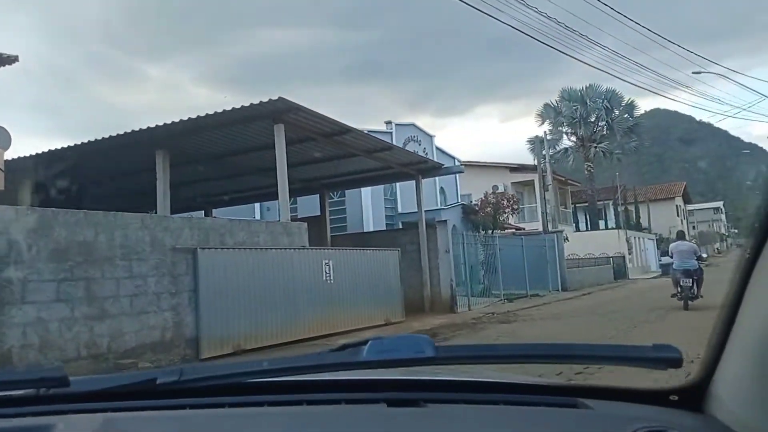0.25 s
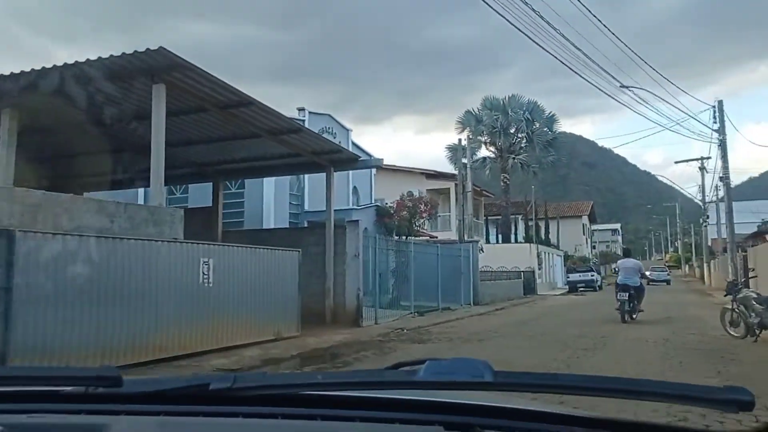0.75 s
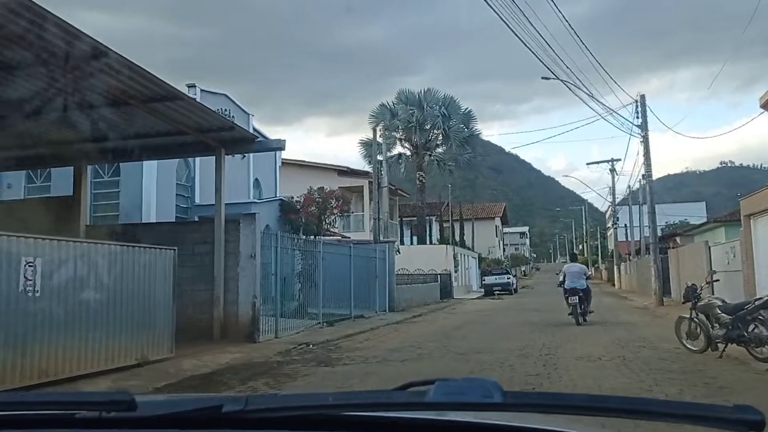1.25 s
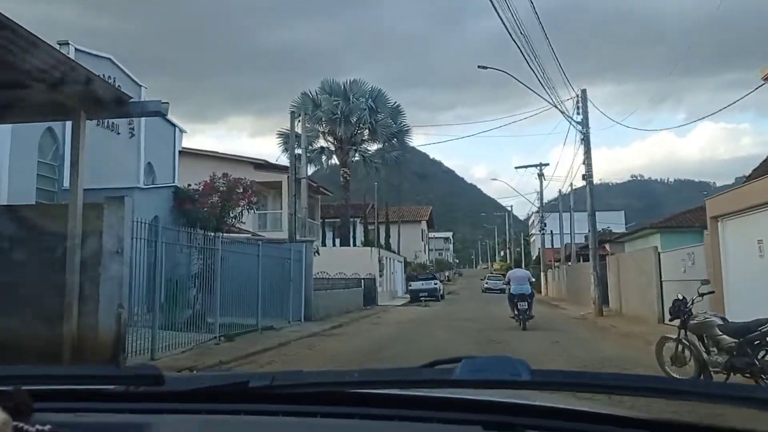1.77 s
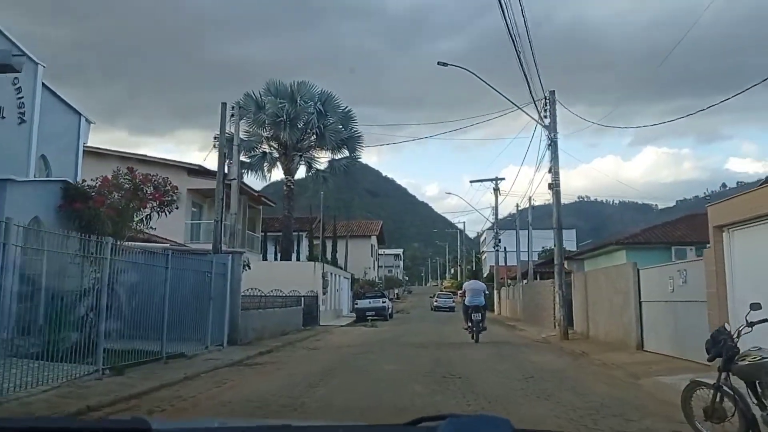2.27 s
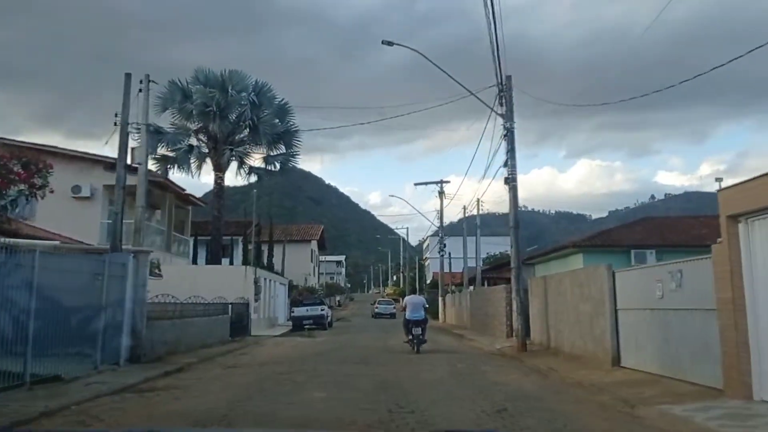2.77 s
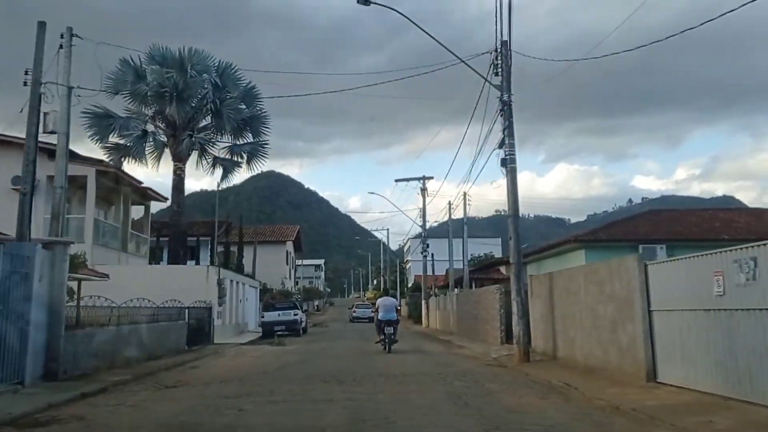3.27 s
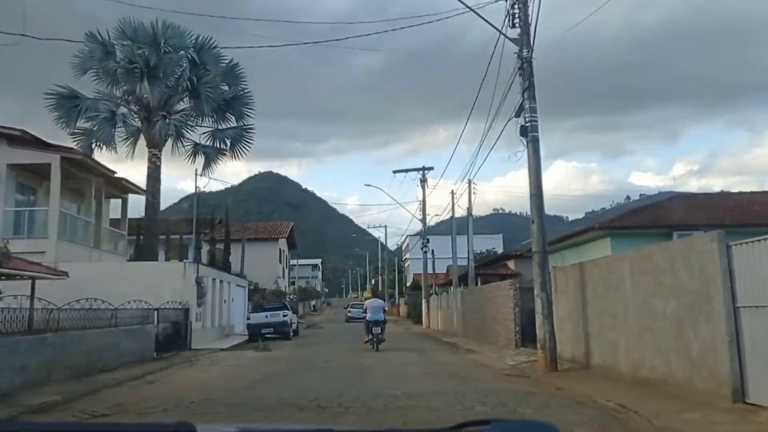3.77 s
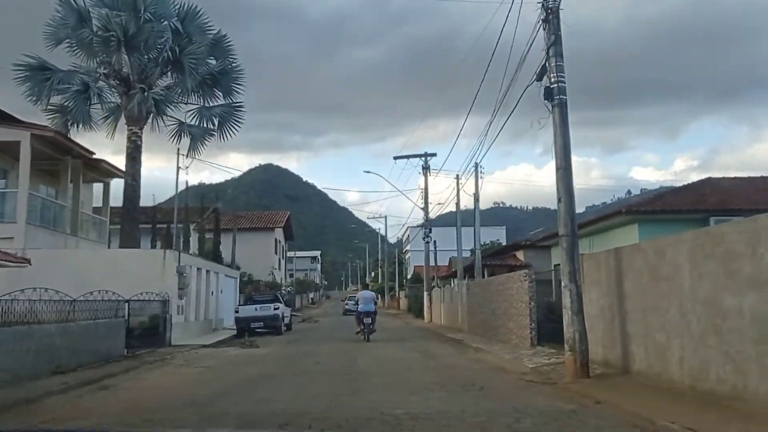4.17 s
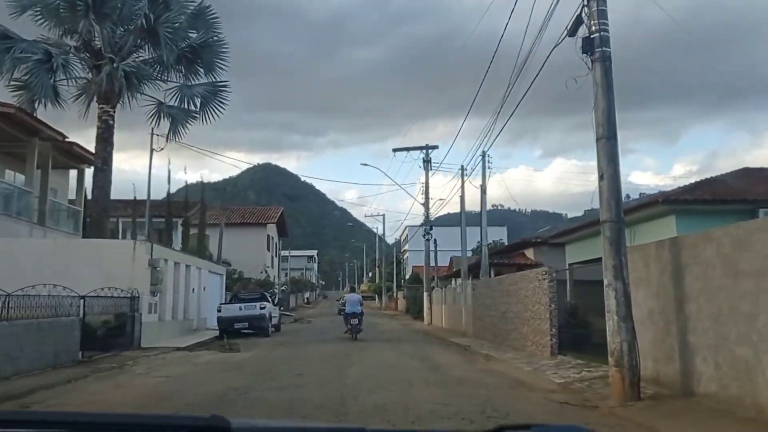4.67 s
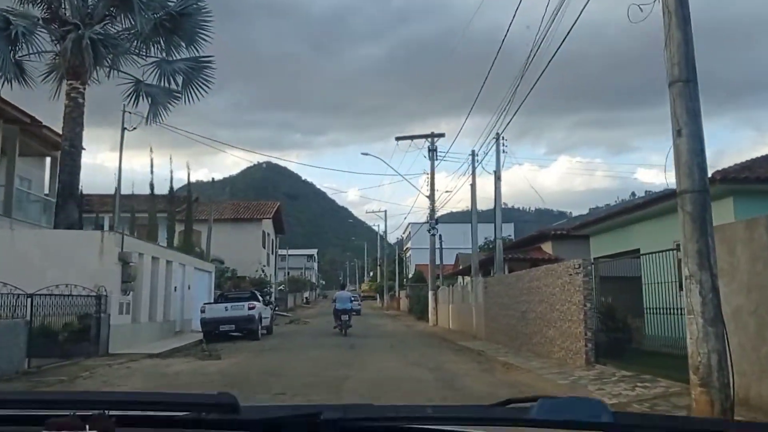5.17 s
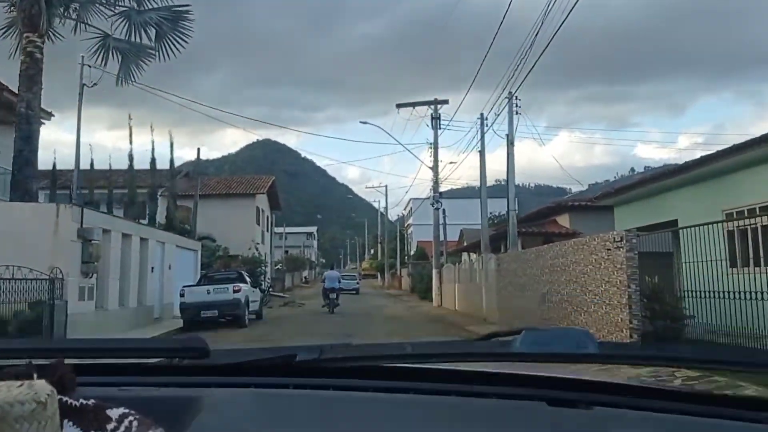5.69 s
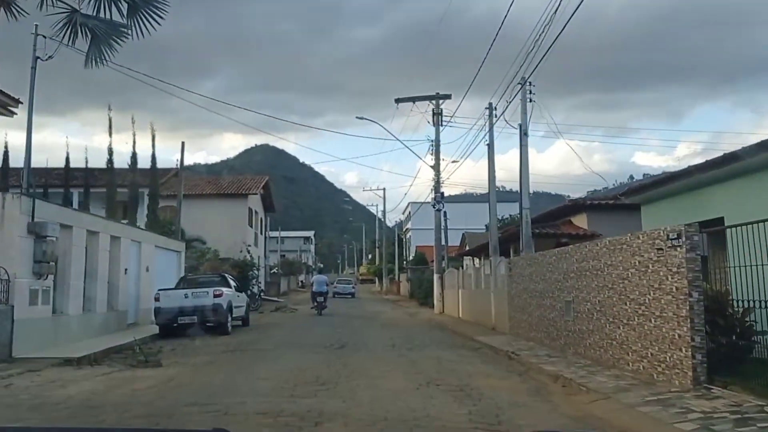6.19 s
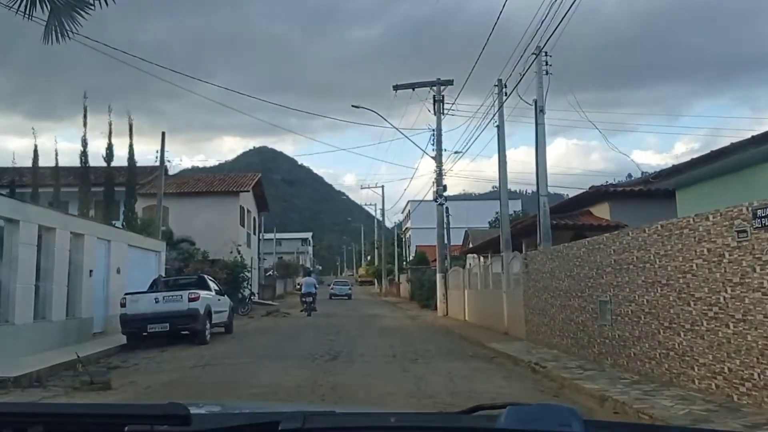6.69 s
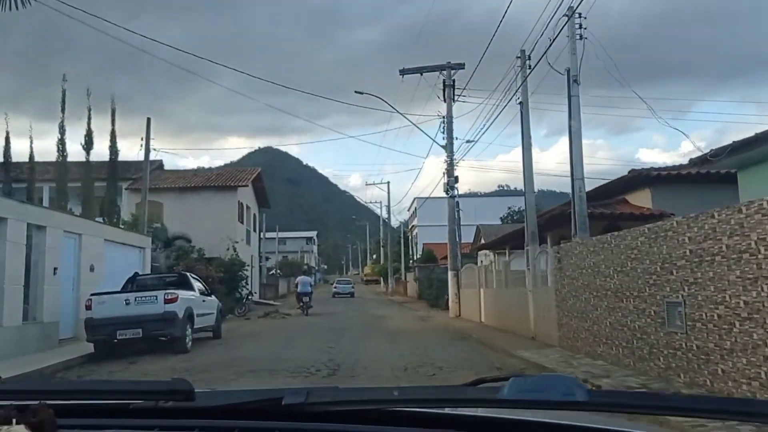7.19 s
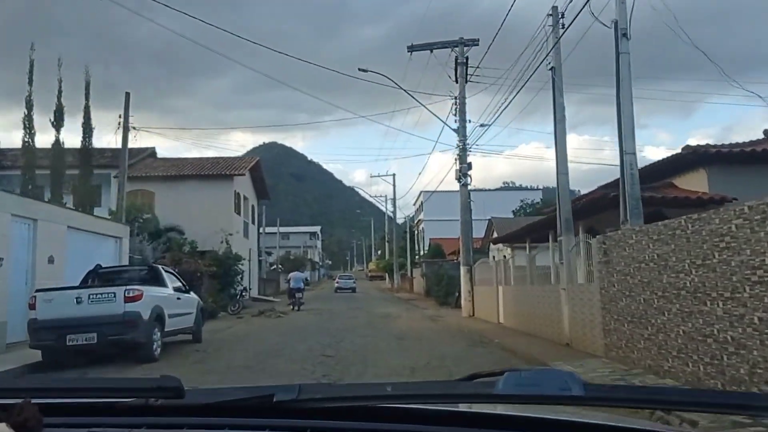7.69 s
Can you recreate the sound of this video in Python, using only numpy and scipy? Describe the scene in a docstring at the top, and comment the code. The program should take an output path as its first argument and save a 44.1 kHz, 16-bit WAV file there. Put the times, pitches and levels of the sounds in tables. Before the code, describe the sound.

Inside a small car rolling slowly over cobbles: low tyre drumming, soft engine hum, rattling squeaky trim, a cloth-scuff flurry around two seconds.

```python
"""Cobbles drum through the tyres and body of a small, slowly rolling car: random blows and coloured noise.
Loose trim hisses (dense noise), squeaks (rough short tones) and ticks (noise cracks with ringing modes).
Cloth scuffs near the microphone and stones knock dully under the floor, both as filtered noise bursts.
The engine hums on three low orders, two noisy tones hum above it, and a thin whistle passes.
A phone microphone with a dull top hears it all."""
import sys
import numpy as np
from scipy import signal
from scipy.fft import rfft, irfft
from scipy.io import wavfile
from scipy.ndimage import uniform_filter1d

SR = 44100
rng = np.random.default_rng(int(sys.argv[2]) if len(sys.argv) > 2 else 0)


def log_audio(samples):
    """Write samples as a 16-bit WAV file to the path given in sys.argv[1]."""
    # one column per channel
    frames = np.atleast_2d(samples).T
    # limit to full scale, then quantise
    limited = np.clip(frames, -1, 1)
    pcm = np.round(limited * 32767).astype(np.int16)
    wavfile.write(sys.argv[1], SR, pcm)


N = 350154   # length in samples


def from_db(db):
    """Turns decibels into a gain."""
    return 10 ** (np.asarray(db) / 20)


def rms_one(x):
    """Scales a sound to rms 1."""
    return x / np.sqrt(np.mean(x ** 2) + 1e-20)


def in_time(rows):
    """Draws straight lines between the rows of a table and gives each column one value per sample."""
    seconds, *columns = np.transpose(rows)
    return [np.interp(np.arange(N) / SR, seconds, column) for column in columns]


def drift(rate):
    """Makes a smooth random curve of rms 1; a higher rate (Hz) makes it wander faster."""
    step = 40   # the curve is drawn on every 40th sample, then joined up
    r = np.exp(-2 * np.pi * rate * step / SR)
    white = rng.standard_normal(N // step + 2002)
    slow = signal.lfilter([1], [1, -2 * r, r * r], white)[2000:]   # drop the settling time
    return np.interp(np.arange(N) / step, np.arange(len(slow)), rms_one(slow))


def resonance(x, hz, width_hz):
    """Lets through a band around one pitch, as a two-pole resonance with gain about 1 on top."""
    r = np.exp(-np.pi * width_hz / SR)
    gain = (1 - r * r) / 2
    return signal.lfilter([gain, 0, -gain], [1, -2 * r * np.cos(2 * np.pi * hz / SR), r * r], x)


def butterworth(x, order, hz, kind="low"):
    """Keeps the sound below, above or between the given frequencies."""
    return signal.sosfilt(signal.butter(order, hz, kind, fs=SR, output="sos"), x)


def table_gain(table, hz):
    """Reads a table of Hz and dB as a gain, with straight lines over log frequency."""
    table_hz, table_db = np.transpose(table)
    return from_db(np.interp(np.log(hz), np.log(table_hz), table_db))


def coloured(x, spectrum):
    """Gives white input the spectrum of a table."""
    hz = np.maximum(np.arange(N // 2 + 1) * SR / N, 1)
    return irfft(rfft(x) * table_gain(spectrum, hz), N)


def add(out, s, sound):
    """Mixes a short sound in at time s."""
    i = round(s * SR)
    out[i:i + len(sound)] += sound[:N - i]


# A thin whistle. Each row: time in seconds, pitch in Hz, level in dB.
WHISTLE_PATH = [(.76, 4540, -66), (.815, 4740, -58), (.835, 4820, -50), (.87, 4900, -52), (.888, 4940, -57),
                (.902, 5030, -53), (.935, 5150, -49), (.97, 5150, -60)]


def whistle():
    """A thin rising sine whose level flutters."""
    hz, db = in_time(WHISTLE_PATH)
    t = np.arange(N) / SR
    first_s, last_s = WHISTLE_PATH[0][0], WHISTLE_PATH[-1][0]
    gate = np.clip(np.minimum(t - first_s, last_s - t) / 0.0152, 0, 1)
    tone = np.sin(2 * np.pi * np.cumsum(hz) / SR)
    return np.sqrt(2) * gate * from_db(db + 2.5 * drift(30)) * tone


# Two noisy tones. Each row: time in seconds, level near 525 Hz in dB, level near 1165 Hz in dB.
HUM_LEVELS = [(0, -52, -64), (.4, -51, -58), (.9, -49, -60), (1.6, -48, -54.5), (2.45, -47, -52.5),
              (3.0, -54, -56), (4.6, -69.5, -63.5), (5.95, -56, -64.5), (6.1, -56.5, -53),
              (6.8, -51.5, -58), (6.96, -62, -48), (7.36, -57, -53), (7.6, -60, -46), (7.74, -58, -64),
              (7.94, -48.5, -46)]


def hums():
    """Noise sent twice through a narrow resonance hums; the level of the upper hum changes faster."""
    low_db, high_db = in_time(HUM_LEVELS)
    low = rms_one(resonance(resonance(rng.standard_normal(N), 525, 31), 525, 31))
    high = rms_one(resonance(resonance(rng.standard_normal(N), 1165, 82), 1165, 82))
    return from_db(low_db + 2.1 * drift(8)) * low + from_db(high_db + 1.3 * drift(30)) * high


# Engine speed and strength. Each row: time in seconds, crank turns per second,
# then the levels of orders 2, 3 and 4 (that many cycles per turn) in dB.
ENGINE_RUN = [(0, 35.8, -42, -36, -31), (.6, 35.9, -40, -40, -31), (.85, 37.2, -42, -44, -33.5),
              (1.2, 37.7, -44, -42, -34), (1.35, 38.2, -43, -32, -33), (1.5, 38.9, -42, -42, -32),
              (1.75, 39.8, -42, -38, -32), (1.9, 40.2, -40, -29, -33), (2.05, 40.6, -40, -31, -36),
              (2.5, 41, -38, -36, -40), (2.7, 41.3, -38, -32, -41), (3.15, 41.5, -39, -35, -33),
              (3.6, 42, -40, -33, -38), (3.95, 38.5, -44, -38, -38), (4.2, 36.2, -40, -42, -33),
              (4.6, 33.9, -37, -44, -34), (5.15, 32.2, -30, -44, -34), (5.55, 31.2, -32, -44, -35),
              (5.85, 30.2, -33, -44, -41), (6.03, 30.3, -46, -44, -42), (6.25, 30.6, -34, -44, -40),
              (6.5, 31.2, -36, -44, -33), (6.8, 31.1, -29, -42, -38), (7.3, 32.5, -30, -42, -36),
              (7.6, 33.4, -31, -42, -32), (7.94, 32.6, -34, -42, -31)]
WAVER_DB = 1.8   # random swing of each order


def engine():
    """Multiples of the crank speed sound as sines that waver a little in level and phase."""
    turns, *levels_db = in_time(ENGINE_RUN)
    phase = 2 * np.pi * np.cumsum(turns) / SR
    out = np.zeros(N)
    for order, db in zip((2, 3, 4), levels_db):
        level = np.sqrt(2) * from_db(db + WAVER_DB * drift(3.2))
        out += level * np.sin(order * phase + 0.073 * drift(1.7))
    return out


# Scuffs of cloth near the microphone. Each row: start in seconds, rough peak in dB,
# centre of its colour in Hz, length in seconds.
CLOTH_SCUFFS = [(0.594, -23.5, 3130, 0.021), (0.627, -33, 3000, 0.012), (0.709, -31, 3100, .015),
                (0.748, -34, 3000, 0.028), (1.892, -21, 1720, 0.01), (1.9235, -18.5, 1600, 0.019),
                (1.925, -23, 3320, 0.0077), (1.949, -14, 1640, 0.013), (1.955, -17, 2700, 0.0077),
                (1.975, -14.5, 3070, 0.009), (1.979, -16.5, 1780, 0.011), (1.999, -17.5, 2600, 0.012),
                (2.024, -18.5, 2440, 0.011), (2.09, -21, 2700, 0.008), (2.051, -24, 2300, 0.018),
                (2.099, -22, 3340, 0.021), (2.13, -24, 1960, 0.015), (2.131, -23, 2820, .008),
                (2.172, -20, 3040, 0.007), (2.208, -31, 1950, 0.012), (2.22, -27, 3200, 0.0092),
                (2.252, -19.5, 3200, 0.037), (2.268, -23, 2630, 0.017), (2.31, -22.5, 2900, 0.017),
                (2.333, -25, 2510, 0.014), (2.34, -23.5, 3500, 0.013), (2.358, -27, 2700, .01),
                (2.4, -22, 2900, .012), (2.38, -22.5, 3100, 0.02), (2.416, -22.5, 2980, 0.032),
                (2.436, -33, 2930, 0.024), (2.457, -24, 2700, .01), (2.471, -31, 3260, 0.035),
                (2.49, -29, 3020, .012), (2.531, -28, 2900, .01), (2.55, -33, 2800, .01),
                (2.509, -31, 2870, 0.016), (2.57, -31, 2930, .01), (2.608, -35, 3000, .015),
                (2.64, -34, 3540, 0.0085), (2.727, -26, 3000, 0.0059), (3.075, -33, 2640, 0.016),
                (3.144, -34, 1800, 0.011), (3.485, -29, 2040, 0.0057), (3.536, -26, 3230, 0.017),
                (4.007, -39, 2800, 0.018), (4.082, -34, 3300, 0.022), (4.187, -33, 2400, 0.017),
                (4.311, -37, 2680, 0.026), (4.358, -41, 1800, 0.011), (4.397, -36, 2390, 0.013),
                (4.438, -39, 2270, 0.029), (6.007, -31, 2920, .01), (6.031, -28, 1600, 0.0082),
                (6.072, -29, 3340, 0.017), (6.088, -22, 1670, 0.0097), (6.116, -29.5, 1700, 0.023),
                (6.148, -31, 2200, .008), (6.234, -32, 3350, 0.0083), (6.336, -30.5, 2980, 0.019),
                (6.428, -30, 3100, 0.006), (6.479, -35, 3170, .012), (6.52, -35, 3400, .012),
                (6.565, -37, 1950, 0.011), (7.475, -32, 3400, 0.011), (7.5, -26, 2900, 0.0088),
                (7.547, -18, 2110, 0.0082), (7.554, -31, 2600, 0.014), (7.595, -32, 3350, 0.032),
                (7.658, -30, 3450, 0.016), (7.895, -29.5, 3620, .015)]
SCUFF_WIDTH_HZ, SCUFF_BROAD_DB = 1210, -13   # width of each colour filter; gain of the broad, bright part
GRIT_PER_S, GRIT_SHARE = 5400, 0.52   # separate grains over smooth friction noise
SCUFF_CREST = 2.5   # assumed peak over rms


def scuffs():
    """Cloth rubs in short puffs of grainy friction noise with a quick start."""
    out, t = np.zeros(N), np.arange(round(.06 * SR)) / SR
    for s, db, hz, length in CLOTH_SCUFFS:
        grains = np.sqrt(SR / GRIT_PER_S) * (rng.random(len(t)) < GRIT_PER_S / SR)
        grit = 1 - GRIT_SHARE + GRIT_SHARE * grains
        shape = np.minimum(t / 0.0007, 1) / (1 + (t / length) ** 4)
        friction = grit * rng.standard_normal(len(t)) * shape
        puff = resonance(resonance(friction, hz, SCUFF_WIDTH_HZ), hz, SCUFF_WIDTH_HZ)
        puff += from_db(SCUFF_BROAD_DB) * np.diff(friction, prepend=0)   # differences are bright
        add(out, s, from_db(db) * puff / (SCUFF_CREST * np.std(puff[t < length])))
    return out


# Squeaks and lower creaks of trim on trim. Each row: start in seconds, level in dB, pitch in Hz.
TRIM_SQUEAKS = [(0.044, -34, 2950), (.1176, -34, 2700), (.174, -31, 3050), (0.219, -37, 2950),
                (.481, -33, 2050), (.592, -29.5, 3440), (0.613, -31, 2900), (.614, -30, 4050),
                (0.723, -38, 1120), (.756, -36, 2960), (.767, -36, 1950), (0.7912, -31.5, 3140),
                (0.846, -38, 3470), (.85, -38, 2300), (0.853, -39, 1170), (.858, -38, 2750),
                (0.921, -36.5, 3050), (.939, -36, 2880), (.9637, -30, 2870), (.989, -35, 2820),
                (1.019, -36, 2820), (1.054, -34, 2850), (1.2, -38, 2850), (1.242, -36, 3450),
                (1.307, -35.5, 2940), (1.325, -35, 2800), (1.356, -37.5, 3050), (1.5924, -34, 2830),
                (3.129, -37, 1090), (3.261, -27.5, 3070), (3.205, -35, 2050), (3.435, -37, 3300),
                (3.474, -35, 3200), (3.484, -36, 2000), (3.552, -27, 2900), (3.655, -37, 3450),
                (3.684, -37, 2000), (3.934, -40, 2900), (4.094, -40, 1164), (4.1196, -41, 1040),
                (4.211, -37, 2880), (4.778, -37, 2840), (4.8564, -40.5, 3430), (4.888, -41, 3200),
                (4.918, -41, 3500), (4.931, -40, 3060), (4.963, -36.5, 2970), (5.036, -36.5, 3040),
                (5.089, -41, 3500), (5.145, -43, 3100), (5.196, -36, 2850), (5.229, -42, 3060),
                (5.494, -36, 3150), (5.524, -35, 2790), (5.64, -35, 2800), (5.765, -38, 2710),
                (5.879, -34.5, 2820), (6.1469, -35, 3440), (6.1492, -37, 1190), (6.189, -30.5, 3330),
                (6.234, -37, 3300), (6.2393, -36, 1180), (6.301, -33, 2970), (6.3446, -38, 3170),
                (6.352, -38, 2900), (6.38, -43, 2900), (6.4218, -46, 3080), (6.4249, -32, 1160),
                (6.428, -35, 3100), (6.476, -34.5, 3030), (6.521, -37.5, 1207), (6.6423, -36, 3330),
                (6.6844, -33, 2850), (6.763, -38, 2930), (6.878, -34, 3020), (6.937, -36, 1200),
                (6.981, -30, 2740), (7.031, -33, 2820), (7.1627, -38, 2830), (7.1832, -33, 3000),
                (7.214, -36.5, 3090), (7.2858, -34.5, 2900), (7.3813, -33, 3020), (7.4863, -32, 2800),
                (7.5147, -24.5, 2950), (7.538, -26, 2860), (7.58, -28, 2940), (7.603, -31.5, 1235),
                (7.64, -35, 2920), (7.664, -39.5, 1154), (7.661, -35, 3000), (7.702, -35.5, 2900),
                (7.739, -36, 2900), (7.773, -36, 2890), (7.852, -32, 3560), (7.851, -37, 1210),
                (7.872, -38, 1130), (7.9003, -29, 1175), (7.903, -34.5, 2870)]
SQUEAK_S, SQUEAK_SLIPS = .005, 15.0   # length: a set part in seconds plus so many slips
SQUEAK_SKEW = .38   # smaller: a more abrupt start


def rough_tone(db, hz, length):
    """A brief tone with its octave, roughened by a randomly wandering phase."""
    t = np.arange(round(np.clip(length, .002, .04) * SR)) / SR
    bow = np.sin(np.pi * (t / t[-1]) ** SQUEAK_SKEW)   # swells and fades
    jitter = np.cumsum(rng.standard_normal(len(t)))
    phase = 2 * np.pi * hz * t + .12 * jitter
    return from_db(db) * bow * (np.sin(phase) + from_db(-16.0) * np.sin(2 * phase))


def faint_tones(count, low_hz, span_hz, top_db, length):
    """Faint short tones fall at random moments, pitches and sizes."""
    out = np.zeros(N)
    for place, pitch, size in rng.random((count, 3)):
        add(out, place * N / SR, rough_tone(top_db - 14 * size, low_hz + span_hz * pitch, length))
    return out


def trim():
    """Trim slips on trim at a nearly even rate: the louder squeaks and creaks; low ones last longer."""
    out = np.zeros(N)
    for s, db, hz in TRIM_SQUEAKS:
        add(out, s, rough_tone(db, hz, SQUEAK_S + SQUEAK_SLIPS / hz))
    return out


# Hard ticks of a loose part. Each row: start in seconds, peak of its body in dB, treble level in dB,
# pitch favoured by the point of contact in Hz.
PART_TICKS = [(0.483, -43, -36, 3200), (0.4953, -19, -16, 2400), (0.5534, -17, -16, 2420),
              (0.602, -32, -26, 3560), (0.6696, -34, -38, 2990), (0.7149, -29, -34, 2800),
              (0.739, -34, -43, 2860), (0.791, -26, -34, 3260), (1.127, -17.5, -15, 2650),
              (1.68, -27.5, -32, 2340), (3.065, -33, -44, 2670), (3.1147, -37, -36, 3140),
              (3.2102, -28, -27, 3480), (3.5498, -27, -32, 2830), (3.8, -23, -25, 3160),
              (3.913, -29, -28, 3103), (5.494, -35, -43, 3091), (5.638, -36, -46, 2750),
              (5.942, -23.5, -18.5, 3340), (6.0309, -30, -25, 3140), (6.071, -29, -34, 3420),
              (6.1132, -40, -24.5, 2850), (6.212, -36, -27.5, 2670), (6.299, -35, -32, 3160),
              (6.383, -22, -28, 2960), (6.4215, -27, -32, 3140), (6.6638, -27, -27, 3200),
              (6.786, -33, -29, 3120), (6.873, -27.5, -27.5, 3060), (7.0054, -30.5, -31, 2796),
              (7.099, -30.5, -35, 2900), (7.3496, -41, -32, 2766), (7.3828, -27.5, -29, 2920),
              (7.489, -28, -33, 2900), (7.547, -35, -34, 2676), (7.634, -30, -31, 2910)]
# How the loose part rings. Each row: pitch in Hz, strength in dB, time to fade by 60 dB in seconds.
PART_MODES = [(2433, 2, 0.024), (2698, -2.5, 0.03), (3138, 2.5, 0.031), (3404, 0, 0.031),
              (4520, -3.5, 0.045)]
SNAP_TOP_HZ = 7560   # the treble is weaker above this
SNAP_OPEN_DB = 7.5   # the harder a tick, the more it reaches above that top


def ticks():
    """Each tick is a crack of noise and the part's modes, strongest near the favoured pitch."""
    out, t = np.zeros(N), np.arange(round(.06 * SR)) / SR
    for s, db, treble_db, favoured_hz in PART_TICKS:
        fade = from_db(-60 * t / .06) + from_db(-60 * t / .008)
        crack = rng.standard_normal(len(t)) * fade
        body = from_db(7.0) * resonance(resonance(crack, 3600, 1300), 2600, 2400)
        for (hz, mode_db, t60), chance in zip(PART_MODES, rng.standard_normal(len(PART_MODES))):
            octaves_away = abs(np.log2(hz / favoured_hz))
            strength_db = mode_db - 25 * octaves_away + 2 * chance
            body += from_db(strength_db - 60 * t / t60) * np.sin(2 * np.pi * hz * t)
        body = butterworth(body, 3, 1900, "high")
        snap = butterworth(crack, 3, 4800, "high")
        snap = snap * from_db(treble_db + SNAP_OPEN_DB) + butterworth(snap, 4, SNAP_TOP_HZ)
        add(out, s, from_db(db) * body / np.abs(body).max() + from_db(treble_db) * snap)
    return out


AFTER_TICK_DB, AFTER_TICK_S = -10.5, 0.0057   # level against the tick's treble; decay time


def after_ticks():
    """Each tick leaves the treble chattering: a gain that jumps up and decays."""
    s, _, treble_db, _ = np.transpose(PART_TICKS)
    kicks = np.full(N, 1e-18)
    kicks[(s * SR).astype(int)] = from_db(treble_db + AFTER_TICK_DB)
    return signal.lfilter([1], [1, -np.exp(-1 / (AFTER_TICK_S * SR))], kicks)


# How hard the stones shake the car, also used by road() below. Each row: time in seconds,
# trim chatter in dB, its treble in dB against that, tyre roar in dB.
ROAD_SHAKE = [(0, -47, 2, -41.5), (.3, -49.5, 5.5, -41.5), (.6, -40, 1.5, -38.5), (.86, -44, 1, -40),
              (1.5, -46, -2.5, -39), (1.85, -42.5, -7.5, -40), (1.95, -37.5, 9, -34.5),
              (2.2, -35, 7.5, -35.5), (2.3, -37.5, 11, -34), (2.45, -38, 6, -32), (2.53, -39, 3, -37),
              (2.63, -41, 2, -40), (2.67, -41.5, -8, -37), (2.9, -45, -3, -40), (3.03, -43, -7, -37),
              (3.12, -38, 3, -34.5), (3.35, -44, -2.5, -39), (3.54, -42.5, 2.5, -35.5),
              (3.76, -46.5, 2, -40.5), (4.03, -49, -6, -41.5), (4.12, -50.5, 5, -44.5),
              (4.26, -47.5, -4.5, -43), (4.38, -46.5, -2, -39), (4.52, -50.5, 2, -44.5),
              (4.8, -50, -3, -44.5), (5.1, -48.5, 3.5, -41), (5.45, -49.5, -6.5, -45.5),
              (5.95, -46, -1, -45), (6.1, -44.5, -4.5, -39.5), (6.45, -45.5, 0, -41),
              (6.6, -46, -5.5, -40.5), (7.4, -48, -20, -41), (7.54, -42, 4, -36.5), (7.72, -49.5, -18, -40),
              (7.94, -45.5, -2, -43)]
# Colour of the chatter. Each row: frequency in Hz, relative level in dB.
CHATTER_COLOUR = [(470, -21), (800, -6.5), (914, -2.5), (991, -4.5), (1160, -7.5), (1400, -8.5),
                  (1780, -7.5), (2510, -9), (3160, -13.5), (4200, -15), (7000, -20.5), (16000, -11.5)]
# Chatter under 1750 Hz: mean level in dB, then its shares of the trim and roar swings.
LOW_CHATTER_DB, LOW_FOLLOWS_TRIM, LOW_FOLLOWS_ROAR = -48, 0.17, 0.29
FLICKER_DB = 1.86   # quick random swing, reduced in the middle and high bands when dense
CALM_DB, DENSE_DB = -42, -35   # between these chatter levels the grains merge into a more even wash


def chatter():
    """Dense tiny contacts hiss in jolts, with faint short tones scattered among them, also in the treble."""
    middle_db, treble_db, roar_db = in_time(ROAD_SHAKE)
    trim_swing, roar_swing = middle_db - middle_db.mean(), roar_db - roar_db.mean()
    low_db = LOW_CHATTER_DB + LOW_FOLLOWS_TRIM * trim_swing + LOW_FOLLOWS_ROAR * roar_swing
    grainy = np.interp(middle_db, [CALM_DB, DENSE_DB], [1, .55])
    shake = from_db(middle_db + grainy * FLICKER_DB * drift(9.8))

    jolts = (rng.random(N) < 60 / SR) * rng.random(N)   # about 60 a second
    fade = np.exp(-1 / (0.0048 * SR))
    jolted = 1 + 0.74 * signal.lfilter([1], [1, -fade], jolts)
    hiss, *bright = (coloured(jolted * noise, CHATTER_COLOUR) for noise in rng.standard_normal((3, N)))

    low = rms_one(butterworth(hiss, 4, 1750))
    low += faint_tones(count=250, low_hz=833, span_hz=1130, top_db=5.0, length=0.0064)

    middle = butterworth(hiss, 3, 1850, "high")
    middle = rms_one(butterworth(middle, 2, 3800) + 0.81 * resonance(middle, 2970, 900))
    middle += grainy * faint_tones(count=800, low_hz=2562, span_hz=1190, top_db=5.5, length=0.0076)

    high, edges = np.zeros(N), np.geomspace(4050, 16000, 14)
    for k, band in enumerate(zip(edges, edges[1:])):   # the treble flickers in narrow patches
        flicker = from_db(3.7 * grainy * drift(21))
        high += flicker * butterworth(bright[k % 2], 2, band, "band")
    high = rms_one(high)
    high += grainy * faint_tones(count=520, low_hz=4110, span_hz=2583, top_db=3.5, length=0.014)

    low_level = from_db(low_db + FLICKER_DB * drift(29))
    high_level = shake * from_db(treble_db) + after_ticks()
    return low_level * rms_one(low) + shake * rms_one(middle) + high_level * rms_one(high)


# Dull knocks of stones through the floor. Each row: start in seconds, peak in dB, centre in Hz.
FLOOR_KNOCKS = [(0.598, -32, 1170), (0.625, -27.5, 689), (0.769, -29, 533), (1.923, -24, 1090),
                (1.952, -24, 616), (1.976, -24, 649), (2.027, -36, 533), (2.094, -24, 533),
                (2.13, -25.5, 513), (2.171, -45, 643), (2.211, -25.5, 746), (2.296, -23.5, 606),
                (2.339, -25, 495), (2.385, -24.5, 584), (2.422, -25.5, 514), (2.447, -30, 479),
                (2.556, -39, 980), (3.067, -29, 514), (3.103, -42, 477), (3.14, -32, 1050),
                (3.479, -32.5, 810), (3.545, -27, 650), (3.568, -28, 474), (3.912, -27.5, 501),
                (4.189, -33, 470), (4.399, -41, 918), (4.616, -39, 789), (5.497, -30, 756),
                (6.031, -33, 1080), (6.089, -24.5, 740), (6.109, -31, 1150), (6.299, -31, 616),
                (6.378, -28, 818), (6.469, -33, 993), (7.492, -27, 581), (7.508, -31, 1060),
                (7.545, -19.5, 1240)]
KNOCK_WIDTH_HZ, KNOCK_T60_S = 720, 0.097   # resonance width; time for the noise to fade by 60 dB


def knocks():
    """Each knock is a burst of noise that starts at once and dies in a broad low resonance."""
    out, t = np.zeros(N), np.arange(round(.06 * SR)) / SR   # cut off after 0.06 s
    for s, db, hz in FLOOR_KNOCKS:
        burst = rng.standard_normal(len(t)) * from_db(-60 * t / KNOCK_T60_S)
        thud = resonance(burst, hz, KNOCK_WIDTH_HZ)
        add(out, s, from_db(db) * thud / np.abs(thud).max())
    return out


# The low drumming swells and sinks at irregular times. Each row: time of the top in seconds,
# rise over the even level in dB.
DRUMMING_SWELLS = [(.24, 5.5), (.58, 5), (.78, 3), (1.02, 5.5), (1.32, 3.5), (1.72, 5), (1.88, 4.5),
                   (2.1, 3.5), (2.4, 2.5), (2.72, 4.5), (3.15, 4), (3.36, 2.5), (3.531, 4.5), (4.22, 6.5),
                   (4.4, 7), (6.83, 3), (6.95, 5.5), (7.56, 5.5), (7.869, 7)]
SWELL_RISE_S, SWELL_FALL_S = 0.081, 0.06


def swells():
    """The swells as a gain in dB: each rises to its top and falls away."""
    t, total_db = np.arange(N) / SR, np.zeros(N)
    for s, db in DRUMMING_SWELLS:
        rise, fall = 1 + (t - s) / SWELL_RISE_S, 1 - (t - s) / SWELL_FALL_S
        total_db += db * np.clip(np.minimum(rise, fall), 0, 1)
    return total_db


# Colour of the broad body drumming. Each row: frequency in Hz, relative level in dB.
DRUMMING_COLOUR = [(12, -54), (20, -27.5), (70, 0.5), (128, 2), (150, 3), (201, -13.5), (400, -23.5),
                   (520, -59.5), (880, -120)]
# Booms of the cabin. Each row: pitch in Hz, width in Hz, relative level in dB.
CABIN_BOOMS = [(72.5, 12, -10.5), (94, 48, -0.5), (113, 17, -4.5), (146.5, 6.9, 0.5), (223, 21, -1.5)]
# Colour of the tyre roar. Each row: frequency in Hz, relative level in dB.
ROAR_COLOUR = [(120, -26.5), (200, -6), (349, -12.5), (454, -16), (567, -16), (914, -24.5), (1100, -24),
               (1430, -46.5), (2420, -120)]
DRUMMING_DB = -29   # drumming level between swells


def road():
    """Tyres drop on stone edges at random; the blows shake the body broadly and ring the cabin booms."""
    drumming_db = DRUMMING_DB + swells()
    roar_db = in_time(ROAD_SHAKE)[2]
    edges = (rng.random(N) < 1200 / SR) * rng.standard_normal(N)   # about 1200 blows a second
    booms = np.zeros(N)
    for k, (hz, width_hz, db) in enumerate(CABIN_BOOMS):
        booms += from_db(db) * rms_one(resonance(edges, hz, width_hz)) * (-1) ** k   # signs alternate
    drumming = rms_one(coloured(edges, DRUMMING_COLOUR)) + from_db(-17.0) * rms_one(booms)
    drumming /= uniform_filter1d(drumming ** 2, size=2600) ** .3   # evens out the rumble
    roar = rms_one(coloured(rng.standard_normal(N), ROAR_COLOUR)) * from_db(1.3 * drift(14))
    return from_db(drumming_db) * rms_one(drumming) + from_db(roar_db) * roar


def scene():
    """Mixes all sources; the close sounds get a short diffuse tail off glass and dash."""
    close = trim() + ticks() + scuffs() + knocks()
    t = np.arange(round(.05 * SR))
    tail = rng.standard_normal(len(t)) * from_db(-60 * t / (.05 * SR))
    cabin = from_db(-9.5) * signal.fftconvolve(close, tail / np.linalg.norm(tail))[:N]
    return (engine() + road() + hums() + chatter() + close + cabin + whistle())[None]


# Dull top of the microphone. Each row: frequency in Hz, gain in dB.
MICROPHONE_RESPONSE = [(3500, -1), (4300, -11), (5200, -16.5), (6500, -23.5), (7500, -32.5), (8500, -44),
                       (10100, -43.5), (11500, -50.5), (13800, -59.5), (14800, -62), (16000, -48)]


def microphone(x):
    """Dulls the treble by the table, with a filter that never sounds ahead of its input (minimum phase)."""
    size = 4096
    hz = np.maximum(np.arange(size // 2 + 1) * SR / size, 1)
    cepstrum = irfft(np.log(table_gain(MICROPHONE_RESPONSE, hz)), size)
    cepstrum[1:size // 2] *= 2   # fold the second half onto the first
    cepstrum[size // 2 + 1:] = 0
    response = irfft(np.exp(rfft(cepstrum)), size)
    return signal.fftconvolve(x, response[None])[:, :N]


HISS_DB = -100   # self-noise of the microphone, before the top is cut
CUTOFF_HZ = 15700   # from here up the sound is at least 70 dB down


def record(dry):
    """Peaks are rounded, the microphone dulls the treble, a faint hiss joins and the top is cut."""
    rounded = .35 * np.tanh(dry / .35)
    heard = microphone(rounded) + from_db(HISS_DB) * rng.standard_normal(dry.shape)
    return signal.sosfilt(signal.cheby2(12, 70, CUTOFF_HZ, fs=SR, output="sos"), heard)


dry = scene()
out = record(dry)
log_audio(out)
```